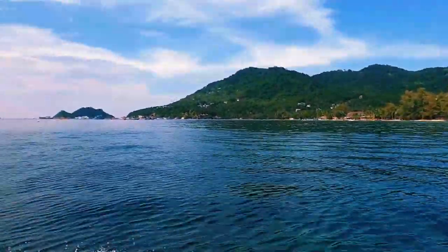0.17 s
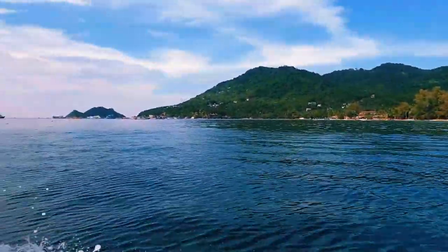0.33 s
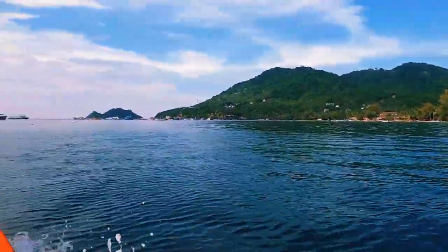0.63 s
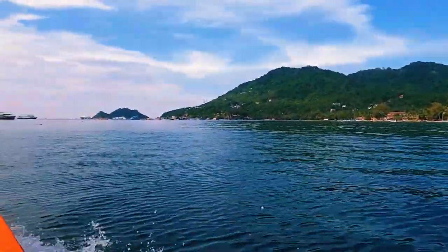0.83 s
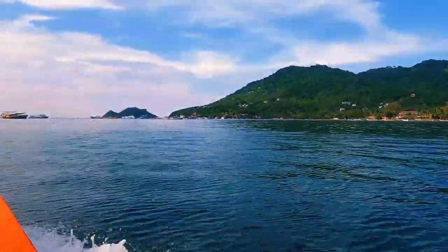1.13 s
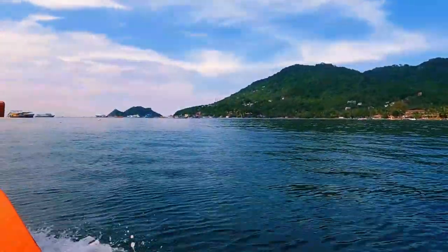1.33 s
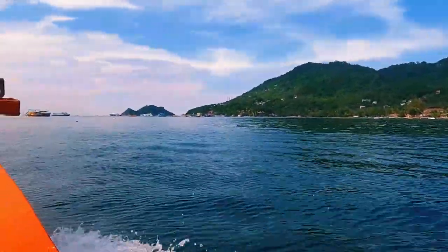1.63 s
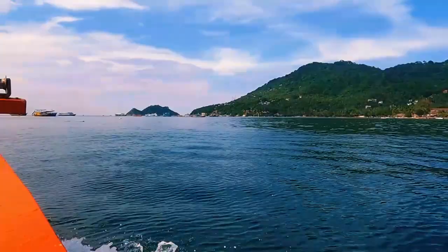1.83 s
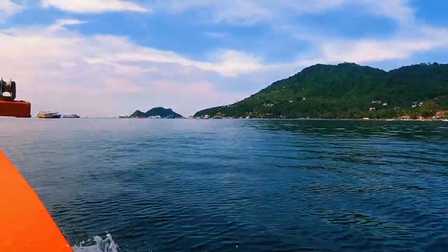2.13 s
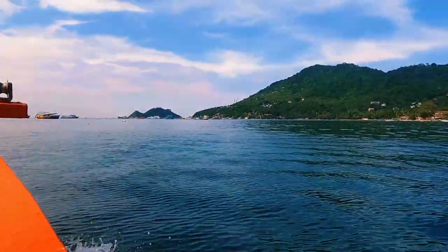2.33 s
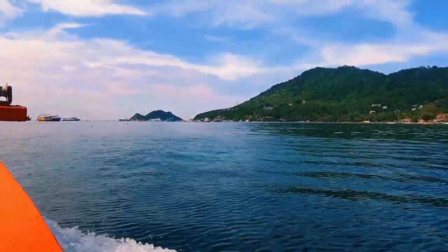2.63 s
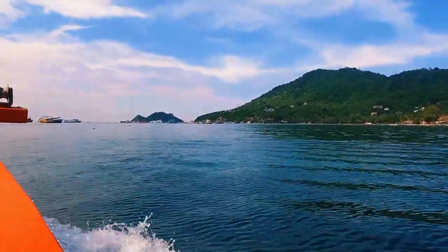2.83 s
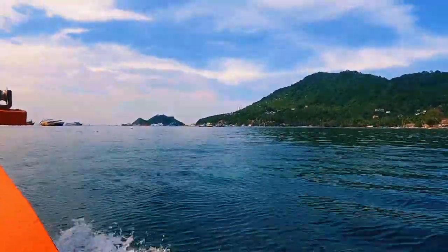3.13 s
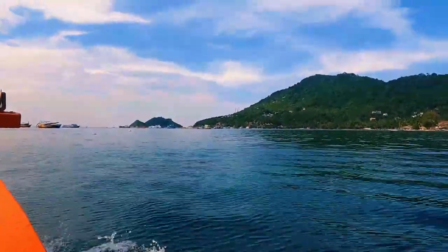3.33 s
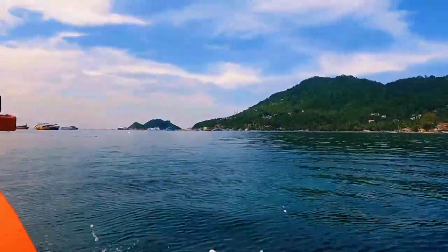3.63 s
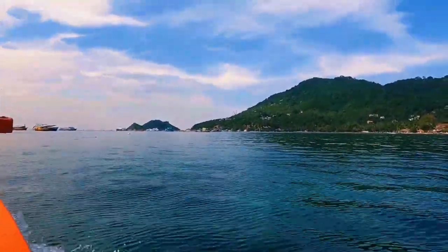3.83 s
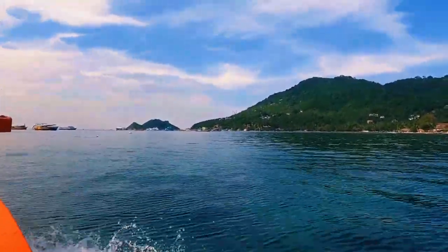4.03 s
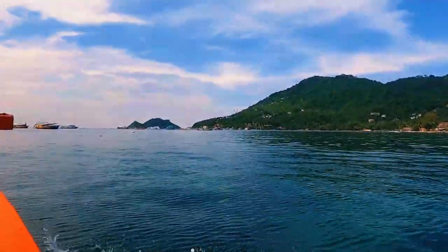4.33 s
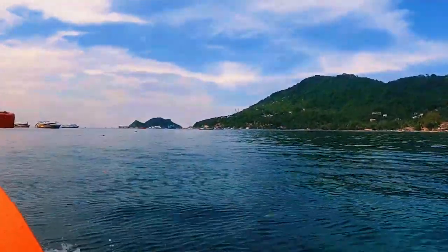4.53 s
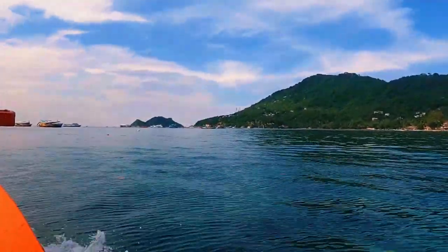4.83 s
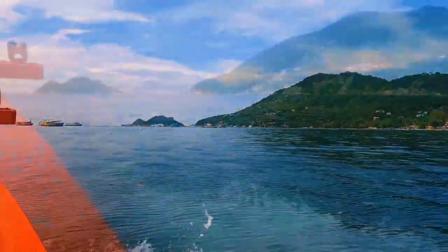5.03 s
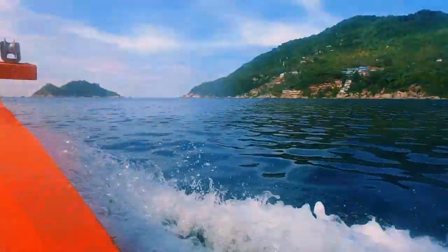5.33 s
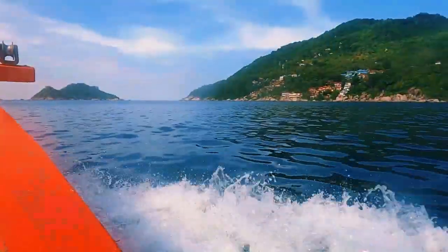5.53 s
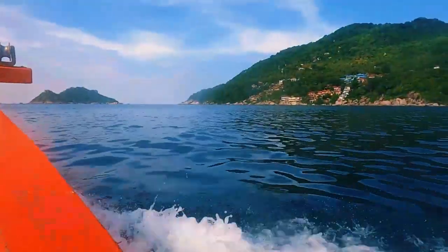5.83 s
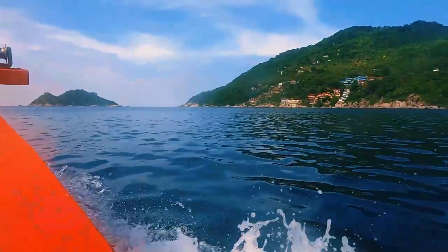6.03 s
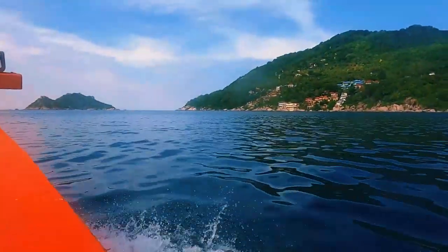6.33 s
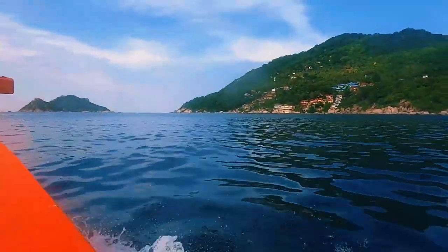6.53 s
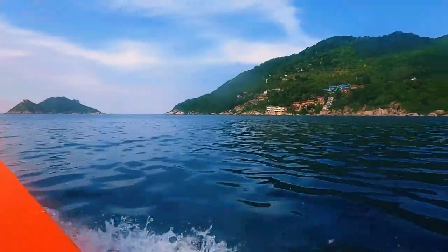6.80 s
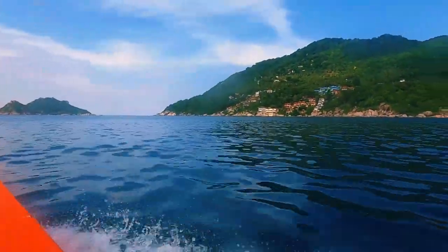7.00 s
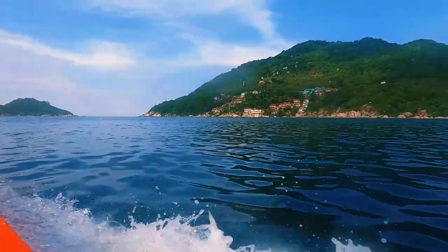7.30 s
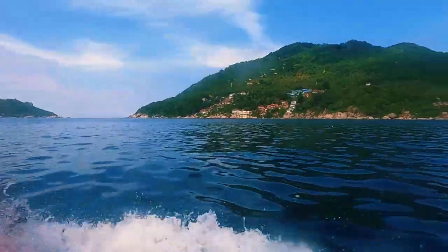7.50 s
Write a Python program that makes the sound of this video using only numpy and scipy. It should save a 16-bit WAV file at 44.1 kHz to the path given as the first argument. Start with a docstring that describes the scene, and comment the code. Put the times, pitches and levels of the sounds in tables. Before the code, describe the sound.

The sound starts at full strength with a boat engine already running, close to the microphone on open water. A low, buzzing drone around 70 Hz sits under a thick, raspy exhaust roar, strongest near 1 kHz, with a thin mechanical whine and steady hiss. From 0 to about 1.7 s the pitch sags slightly while the low roar thickens; it then recovers slowly, rising more noticeably from 4 to 5 s. Near 5.0 s a second position overlaps for about a fifth of a second, then the near engine cuts off. The rest is much quieter and duller: a hum around 80 Hz, throbbing low rumble and soft water rush. Bow-wave washes swell around 5.6, 6.2 and 7.0 s, with tiny bright drops around 5.7-6.0 and 7.0 s. Water slaps the hull dully at 5.9 and 6.4 s, then hardest at 7.55-7.6 s, just before the abrupt end.

```python
"""A four-cylinder engine drives a long-tail boat on calm water: sines locked to its firing, to a geared shaft
with a three-blade propeller and to a whining belt-driven part. Coloured noise makes the roar and rush.
It is heard from two seats: first close to the engine, then, after a short overlap and a hard cut,
further forward, where it is duller. There the bow wave adds washes of hiss and short ringing drops,
and water slaps the hull."""
import sys
import numpy as np
from scipy import signal
from scipy.fft import rfft, irfft, next_fast_len
from scipy.io import wavfile

SR = 44100
rng = np.random.default_rng(int(sys.argv[2]) if len(sys.argv) > 2 else 0)


def digitize_waveform(pressure):
    """Quantize a signal to 16-bit integers and store it at the path in sys.argv[1].

    Rows of a 2-D input are taken as channels; values are limited to [-1, 1].
    """
    field = np.atleast_2d(pressure).T
    bounded = np.clip(field, -1, 1)
    quanta = np.round(bounded * 32767).astype(np.int16)
    wavfile.write(sys.argv[1], SR, quanta)


N = 337806

NEAR_SPAN, FAR_SPAN = (-1, 5.1665), (4.944, 8)   # (start t/s, end t/s); both reach past the ends of the sound
BEAT_CREST_S = 4.9785   # the firing tones of both seats are in step here
SHAFT_RATIO, BELT_RATIO = .1832, .5938   # turns per firing
TREBLE_PATCHY = 1.48   # the hiss flickers this many times more than the rumble
CUTOFF_HZ = 15800
FFT = next_fast_len(N, True)
TIME, HZ = np.arange(N) / SR, np.arange(FFT // 2 + 1) * SR / FFT

# engine run, near: (t/s, firings per s, level/dB of the firing tone, of its 3rd and of its 2nd multiple)
NEAR_RUN = [(0.0, 70.75, -15.0, -30, -34), (0.3, 70.25, -14.1, -31, -32.5),
            (0.82, 68.07, -14.9, -29, -31.5), (1.03, 67.56, -16.0, -23.2, -28.5),
            (1.3, 66.8, -17.0, -22.9, -25.5), (1.64, 66.58, -16.6, -22, -27.5),
            (2.05, 66.57, -16.4, -24, -28.5), (2.26, 66.7, -14.1, -25, -29),
            (2.67, 67.27, -14.9, -28.5, -34.5), (2.88, 67.45, -15.8, -22.5, -34),
            (3.29, 67.95, -14.6, -25.6, -41), (3.49, 67.85, -14.2, -32, -46),
            (3.75, 67.67, -13.7, -27.5, -38), (4.08, 68.05, -13.9, -28.6, -35),
            (4.72, 71.5, -13.7, -27.5, -32), (5.17, 72.25, -14.0, -28.5, -30)]
# engine run, far: (t/s, firings per s, level/dB of the firing tone, level/dB of the propeller blade tone)
FAR_RUN = [(4.95, 80.25, -18.0, -39.8), (5.2, 80.25, -18.0, -39.8), (5.38, 80.06, -18.6, -36.0),
           (5.6, 79.45, -22.5, -29.5), (5.8, 79.42, -20.6, -25.9), (6.0, 79.93, -18.5, -25.8),
           (6.2, 79.88, -16.7, -30.8), (6.6, 79.6, -19.3, -29.8), (7.23, 79.8, -18.1, -27.8),
           (7.43, 80.25, -18.0, -29.5), (7.66, 80.17, -17.1, -27.6)]
# leading tones, those with levels in the run tables first: (firing multiple, shaft multiple, belt multiple)
NEAR_LEADS = [(1, 0, 0), (3, 0, 0), (2, 0, 0), (0, 0, 7), (0, 0, 8), (0, 0, 13), (9, 0, 0), (17.5, 0, 0),
              (16, 0, 0), (16.5, 0, 0), (17, 0, 0)]
FAR_LEADS = [(1, 0, 0), (0, 3, 0), (2.5, 0, 0), (0, 0, 6)]
# hull or pipe resonances, one row per remaining near lead:
# (resonance f/Hz, width/Hz, level/dB off it, level change/dB on it)
NEAR_RESONANCES = [(291.3, 17.8, -39.5, 12), (328, 22, -40, 4), (560.5, 9.6, -37, 11), (612.7, 24, -46, 9),
                   (1183.6, 35, -42.5, 10.5), (1140, 40, -51, 16), (1180, 73, -36, -1),
                   (1130, 45, -43.5, 8)]
# remaining far leads, the 2.5th firing multiple and the 6th belt tone: (level/dB)
FAR_STEADY_DB = [-38.5, -43]
# uneven cylinders add tones at quarter multiples: (firing multiple, level/dB)
NEAR_ORDERS = [(.5, -37), (.75, -41), (1.25, -39), (1.5, -36), (2.25, -36), (2.5, -42), (3.75, -46),
               (4, -43), (4.5, -47), (5, -46), (5.5, -49), (6, -50), (6.5, -50), (7, -50), (7.5, -52),
               (8, -51), (8.5, -50), (8.75, -55), (9.25, -48), (9.5, -49), (9.75, -51), (10, -46),
               (11, -54), (11.25, -51), (12, -50), (12.5, -53), (13.25, -52), (13.5, -43), (14, -43),
               (14.5, -41), (15.5, -44), (16.75, -49), (18, -44), (18.5, -49), (20.5, -54)]
FAR_ORDERS = [(1.5, -45), (1.75, -50), (2, -43), (2.25, -53), (3, -50), (3.5, -56), (5.5, -63), (6, -61),
              (6.75, -61), (7.5, -57), (7.75, -58), (8, -59), (9.5, -63), (10, -66), (11.5, -59),
              (12.25, -62), (13.5, -57), (17, -57), (17.75, -56), (18, -51), (18.25, -58), (20.25, -64),
              (21, -59), (23.5, -59)]
# the propeller load throbs against the firing: (firing multiple, shaft multiple, level/dB)
NEAR_SHAFT = [(0, 2, -54), (.5, 1, -41), (.75, 3, -41), (0, 3, -32), (0, 4, -45), (1, -1, -38), (1, 1, -32),
              (1, 2, -40), (1, 3, -45), (2, -1, -42), (2, 1, -41), (2, 3, -38), (3, 1, -43)]
FAR_SHAFT = [(0, 1, -44), (0, 7, -50), (1, 1, -44), (1, 3, -50), (2, 1, -46)]
# belt-driven whine: (belt multiple, level/dB)
NEAR_BELT = [(6, -37), (9, -43), (20, -45), (26, -38), (39, -57)]
FAR_BELT = [(7, -47), (9, -61), (19, -54.5)]
# colour of the exhaust, hull and water roar: (f/Hz, relative level/dB)
NEAR_ROAR = [(10, -33), (28, -29), (36, -27), (52, -18), (72, -19), (88, -14), (100, -21), (112, -24),
             (145, -16), (160, -20), (200, -15), (228, -22), (260, -20), (411, -22.5), (721, -29.5),
             (1150, -24.5), (1460, -31.5), (1930, -32.5), (2380, -44), (5040, -39.5), (7330, -54.5),
             (8630, -58), (13000, -79.5), (16000, -97)]
FAR_ROAR = [(10, -36.5), (17, -13), (28, -9), (50, -6), (66, -18.5), (86, -18.5), (110, -23.5),
            (130, -27.5), (195, -22.5), (230, -29.5), (300, -27.5), (350, -27), (401, -33), (696, -32),
            (1430, -33), (2200, -43), (6170, -45), (8630, -62), (11200, -74), (16000, -100)]
# peaks and hollows added to that colour: (f/Hz, width/Hz, level change/dB)
NEAR_PEAKS = [(620, 92, 6), (786, 32, 8), (949, 132, 9), (1052, 67, 7.5), (1150, 49, 4.5), (1333, 170, 6),
              (1742, 35, 4.5), (2560, 290, 2.5), (3035, 260, 5), (4990, 400, 1), (5500, 220, -5),
              (6070, 310, 6.5), (7180, 980, 9.5), (10600, 500, -3), (11970, 1400, 10)]
FAR_PEAKS = [(577, 110, 3.5), (810, 360, -5.5), (920, 48, 4.5), (962, 74, 4), (1115, 69, -1), (1364, 66, 5),
             (1470, 110, 3.5), (1570, 80, -4), (1714, 52, 4.5), (1780, 60, -3), (1850, 100, 5),
             (2415, 140, 7.5), (3020, 320, 5), (3610, 280, -4.5), (3800, 300, 4), (4180, 530, 9),
             (5990, 280, -10.5), (6100, 370, 11)]
# swell of the roar: (t/s, level/dB below 400 Hz, level/dB from 400 Hz to 2.2 kHz, level/dB above)
NEAR_SWELL = [(0, -30, -25.5, -42.5), (.8, -28, -27.5, -43.5), (1.6, -23.5, -24, -41),
              (2.4, -25, -25.5, -42.5), (3.2, -25, -25.5, -42), (4.201, -27, -25.5, -42),
              (5.17, -27, -26, -43)]
FAR_SWELL = [(4.95, -31, -29, -54), (5.0, -30.5, -38, -41.5), (5.3, -34.5, -39.5, -45.5),
             (5.65, -29, -39, -43), (6.1, -31.5, -40.5, -44.5), (6.7, -29.5, -40.5, -45.5),
             (7.1, -33, -39.5, -43.5), (7.66, -26, -39.5, -43)]
# edges of the noise bands that flicker separately: (f/Hz)
BAND_EDGES_HZ = [0, 60, 150, 400, 850, 1300, 2200, 3500, 5500, 8000, 23000]
# two lists on left against right: (f/Hz, left minus right level/dB) and (f/Hz, left's lead/rad)
NEAR_PAIR = [(60, 0.7), (88, 0.7), (130, 1.0), (190, 1.0), (270, 1.0), (400, 2.0), (580, 3.5), (850, 4.5),
             (1240, 4.5), (1590, 3.5), (2210, 1.5), (3060, 9.0), (4100, 0.0), (4800, -3.0), (5600, -3.5),
             (7400, -2.0), (8600, 1.5)], [(0, 0), (1980, 0.0), (2240, -0.4), (2670, -2.1), (2930, -1.3),
             (3360, 0.3), (4480, 0.7), (5080, 0.4), (5600, 0.6), (7240, -0.2), (8350, -0.1)]
FAR_PAIR = [(60, 0.7), (88, 0.7), (130, 0.5), (190, 0.5), (270, 1.0), (400, 1.0), (580, 2.5), (850, 2.5),
            (1240, 2.0), (1800, 2.5), (2630, 3.5), (3840, 1.0), (5600, -2.0), (8180, 0.5)], [(0, 0),
            (780, -0.2), (1120, 0.0), (1550, -0.4), (1980, -0.2), (2580, -0.9), (3450, -1.1), (4050, 0.1),
            (4310, 0.3), (4650, -0.2), (5080, 0.2), (6550, -0.0), (7490, 0.1), (8350, -0.0)]
# how alike the noise is on left and right: (f/Hz, likeness from 0 to 1)
NEAR_LIKENESS = [(60, 0.97), (300, 0.99), (1500, 1), (2700, 0.88), (4000, 0.75), (6000, 0.94), (9000, 0.67)]
FAR_LIKENESS = [(60, 1), (300, 1), (600, 0.93), (1500, 0.95), (2700, .7), (4500, 0.87), (9000, 0.93)]
# longer washes of the bow wave: (crest t/s, level/dB, centre f/Hz, length/s)
WASHES = [(5.6, -48, 2400, 0.59), (5.7, -49, 4970, .3), (5.573, -42, 1250, .14), (6.0, -47, 320, .3),
          (6.25, -46, 1400, 0.12), (7.004, -45, 1480, 0.25), (7.06, -49, 2600, 0.34),
          (7.584, -44, 5000, 0.089)]
# drops thrown up by the bow wave: (t/s, level/dB, ring f/Hz, time to fall 60 dB/s)
SPRAY = [(5.672, -42, 3200, .03), (5.697, -42, 3000, .02), (5.755, -38, 5200, .025), (5.8, -43, 5600, .02),
         (5.943, -33, 5550, .025), (5.965, -42, 4000, .02), (6.425, -46, 6900, .02),
         (6.987, -34, 5110, .025), (7.28, -50, 8600, .015), (7.568, -42, 4200, .04)]
# water slapping the hull: (t/s, level/dB, ring f/Hz, time to fall 60 dB/s)
SLAPS = [(5.93, -31, 140, .15), (6.34, -24, 42, .25), (6.378, -26, 420, .03), (6.386, -30, 680, .06),
         (6.399, -29, 600, .04), (7.547, -30, 520, .03), (7.555, -20, 45, .25), (7.5895, -17.5, 610, .024),
         (7.591, -22, 200, .04)]


def amp(db):
    """Turn decibels into a factor."""
    return 10 ** (np.asarray(db) / 20)


def rms_one(x):
    """Scale a signal to an average strength (rms) of 1."""
    return x / np.sqrt(np.mean(x ** 2) + 1e-20)


def in_time(rows):
    """Draw each column of a table as a line through time."""
    s, *columns = np.transpose(rows)
    return [np.interp(TIME, s, c) for c in columns]


def at_hz(points):
    """Draw a curve over pitch, with straight lines on a log scale."""
    hz, value = np.transpose(points)
    return np.interp(np.log(HZ + 1), np.log(hz + 1), value)


def drift(rate_hz):
    """Slow random wandering of spread 1: noise at every 40th sample, low-passed twice."""
    r = np.exp(-2 * np.pi * rate_hz * 40 / SR)
    noise = rng.standard_normal(N // 40 + 2002)
    slow = signal.lfilter([1], [1, -2 * r, r * r], noise)[2000:]   # skip the filter's start
    return np.interp(np.arange(N) / 40, np.arange(len(slow)), rms_one(slow))


def firing_angle(per_s):
    """One turn of this angle is one firing, counted from the beat crest."""
    turns = np.cumsum(per_s) / SR
    return 2 * np.pi * (turns - np.interp(BEAT_CREST_S, TIME, turns))


def order_of(firing, shaft, belt):
    """Cycles of a tone per firing, given its multiples of firing, shaft and belt."""
    return firing + shaft * SHAFT_RATIO + belt * BELT_RATIO


def on_resonance(per_s, leads, resonances):
    """A tone's level changes as the revs carry its pitch through a hull or pipe resonance."""
    levels = []
    for lead, (hz, width, off_db, change_db) in zip(leads, resonances):
        pitch = per_s * order_of(*lead)
        levels.append(off_db + change_db / (1 + (2 * (pitch - hz) / width) ** 4))
    return levels


def tones(angle, leads, lead_dbs, orders, shaft, belt, jitter_rad, waver_db):
    """Sines locked to crank, shaft and belt; the higher the order, the more uneven turning blurs it."""
    rows = [(order_of(*lead), db) for lead, db in zip(leads, lead_dbs)]
    rows += list(orders)
    rows += [(order_of(f, s, 0), db) for f, s, db in shaft]
    rows += [(order_of(0, 0, b), db) for b, db in belt]
    uneven = angle + jitter_rad * drift(5.3)
    wavers = [drift(1.6) for _ in range(6)]
    out = 0
    for k, (order, db) in enumerate(rows):
        if k < 3:   # steady; whole multiples line up as in a sawtooth (slow rise, quick fall)
            start, waver = -(round(order) - 1) * np.pi / 2, 0
        else:
            start, waver = rng.uniform(0, 2 * np.pi), wavers[k % 6]
        level = np.sqrt(2) * amp(db + waver_db * waver)   # sqrt(2): the table gives rms levels
        out = out + level * np.cos(order * uneven + start)
    return out


def cycle_pattern(angle):
    """Noise that repeats every four firings, made of overtones 24 to 140 of the engine cycle."""
    overtones = np.zeros(4097, complex)
    overtones[24:141] = rng.standard_normal(117) + 1j * rng.standard_normal(117)
    # as dense as white noise of spread 1, for about 17.5 cycles per second
    loop = rms_one(irfft(overtones)) * np.sqrt(117 * 17.5 / (SR / 2))
    place = angle / (8 * np.pi) % 1
    return np.interp(place, np.arange(8193) / 8192, np.append(loop, loop[0]))


def roar(angle, spectrum, peaks, swell, firing_db, cycle_db, patchy_db, repeats):
    """Two noises of one colour; bands flicker, and some puff with each firing or engine cycle."""
    colour = at_hz(spectrum)
    for hz, width, db in peaks:
        colour = colour + db / (1 + (2 * (HZ - hz) / width) ** 2)
    source = rng.standard_normal((2, N))
    # part of the first noise repeats each engine cycle, which gives fine lines of pitch
    source[0] = np.sqrt(1 - repeats) * source[0] + np.sqrt(repeats) * cycle_pattern(angle)
    coloured = rfft(source, FFT) * amp(colour)
    together = drift(20)   # flicker shared by all bands
    parts = [0, 0, 0]   # low, middle, treble
    for low, high in zip(BAND_EDGES_HZ, BAND_EDGES_HZ[1:]):
        band = irfft(coloured * ((HZ >= low) & (HZ < high)), FFT)[:, :N]
        firing_puff = firing_db * np.cos(angle) * (400 <= low < 1300)
        cycle_puff = cycle_db * np.cos(angle / 4) * (low >= 850)
        depth_db = patchy_db * (TREBLE_PATCHY if low >= 2200 else 1)
        flicker = depth_db * (together + drift(11))
        part = int(low >= 400) + int(low >= 2200)
        parts[part] = parts[part] + band * amp(firing_puff + cycle_puff + flicker)
    return sum(rms_one(x) * amp(db) for x, db in zip(parts, in_time(swell)))


def seat(direct, noises, likeness, pair, span):
    """Left and right hear one field with their own level and lag; part of the noise differs."""
    balance_db, lead_rad = (at_hz(p) for p in pair)
    tilt = amp(balance_db / 2) * np.exp(.5j * lead_rad)   # half to each side
    alike = np.clip(at_hz(likeness), 0, 1)
    mid, side = rfft(noises, FFT)
    shared = rfft(direct, FFT) + mid * np.sqrt((1 + alike) / 2)
    apart = side * np.sqrt((1 - alike) / 2)
    start, end = span
    fade_in = np.clip((TIME - start) / .025, 0, 1)
    # a very brief dip to .55, then a hard cut
    ending = np.clip(.55 + (end - TIME) / .003, 0, 1) * (TIME < end)
    return irfft([(shared + apart) * tilt, (shared - apart) / tilt], FFT)[:, :N] * fade_in * ending


def near_seat():
    """Close to the engine: loud firing tone and a strong exhaust rasp near 1 kHz."""
    per_s, *lead_dbs = in_time(NEAR_RUN)
    lead_dbs += on_resonance(per_s, NEAR_LEADS[3:], NEAR_RESONANCES)
    angle = firing_angle(per_s)
    engine = tones(angle, NEAR_LEADS, lead_dbs, NEAR_ORDERS, NEAR_SHAFT, NEAR_BELT,
                   jitter_rad=.012, waver_db=1.5)
    noises = roar(angle, NEAR_ROAR, NEAR_PEAKS, NEAR_SWELL,
                  firing_db=1.0, cycle_db=0.3, patchy_db=0.33, repeats=.15)
    return seat(engine, noises, NEAR_LIKENESS, NEAR_PAIR, NEAR_SPAN)


def far_seat():
    """Further forward at higher revs: hum, rushing water, washes, spray and slaps."""
    per_s, *lead_dbs = in_time(FAR_RUN)
    lead_dbs += FAR_STEADY_DB
    angle = firing_angle(per_s)
    engine = tones(angle, FAR_LEADS, lead_dbs, FAR_ORDERS, FAR_SHAFT, FAR_BELT,
                   jitter_rad=.008, waver_db=1.2)
    noises = roar(angle, FAR_ROAR, FAR_PEAKS, FAR_SWELL,
                  firing_db=1.0, cycle_db=0.35, patchy_db=0.7, repeats=.22)
    water = washes() + knocks(SPRAY, puff_share=.3) + knocks(SLAPS, puff_share=.5)
    return seat(engine + water, noises, FAR_LIKENESS, FAR_PAIR, FAR_SPAN)


def washes():
    """The bow wave breaks in narrow bands of hiss, each of which swells and sinks."""
    out = 0
    for s, db, hz, length in WASHES:
        band = signal.butter(2, [hz / 1.2, hz * 1.12], "band", fs=SR, output="sos")
        hiss = rms_one(signal.sosfilt(band, rng.standard_normal(N)))
        shape = np.cos(np.pi * np.clip((TIME - s) / length, -.5, .5)) ** 2
        out = out + amp(db) * shape * hiss
    return out


def knocks(events, puff_share):
    """Each blow of water rings briefly at its own pitch, blurred by a puff of noise around it."""
    length = 12000   # samples
    out, t = np.zeros(N + length), np.arange(length) / SR
    for s, db, hz, t60 in events:
        band = signal.butter(4, [hz / 1.3, hz * 1.3], "band", fs=SR, output="sos")
        puff = rms_one(signal.sosfilt(band, rng.standard_normal(length)))
        ring = np.sin(2 * np.pi * hz * t) + puff_share * puff
        rise_s = .0016 + .3 / hz   # low rings start more slowly
        rise = np.sin(np.minimum(t / rise_s, 1) * np.pi / 2) ** 2
        first = round(s * SR)
        out[first:first + length] += amp(db) * ring * amp(-60 * t / t60) * rise
    return out[:N]


def scene():
    """The near seat, then the far seat, with a short overlap."""
    return near_seat() + far_seat()


def record(dry):
    """A steep low-pass filter removes the very top of the treble."""
    return signal.sosfilt(signal.cheby2(12, 70, CUTOFF_HZ, fs=SR, output="sos"), dry)


dry = scene()
out = record(dry)
digitize_waveform(out)
```